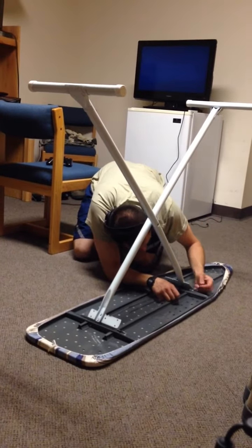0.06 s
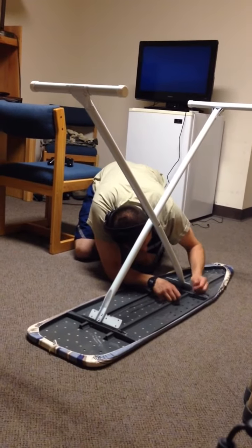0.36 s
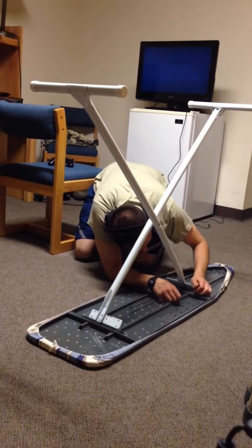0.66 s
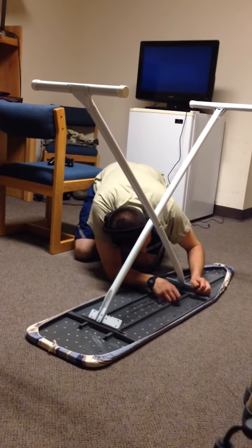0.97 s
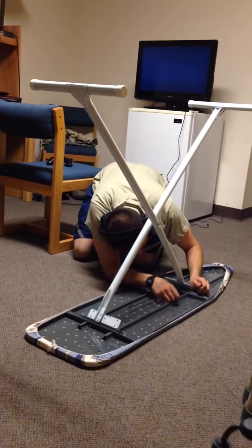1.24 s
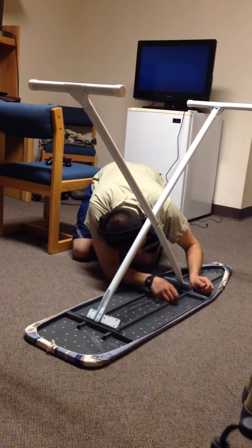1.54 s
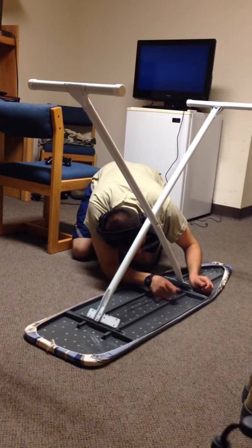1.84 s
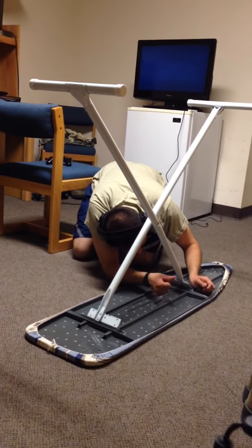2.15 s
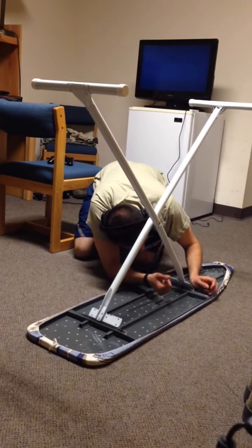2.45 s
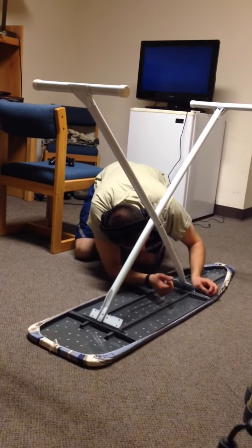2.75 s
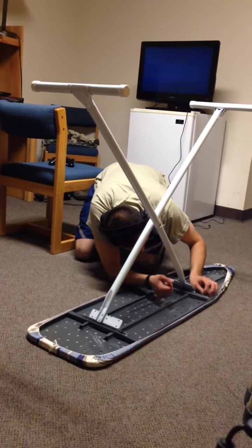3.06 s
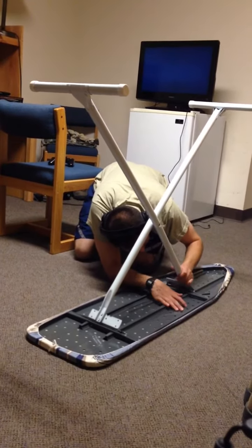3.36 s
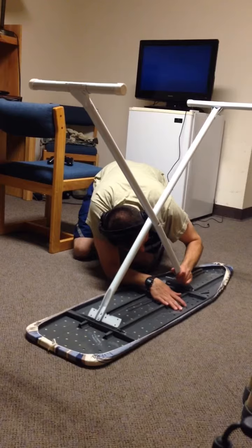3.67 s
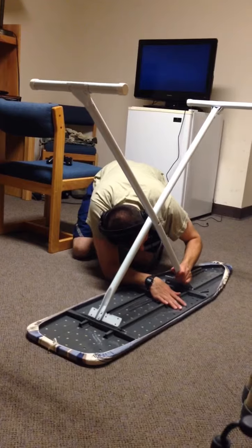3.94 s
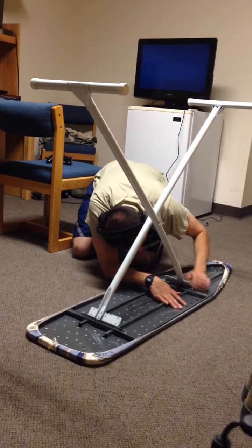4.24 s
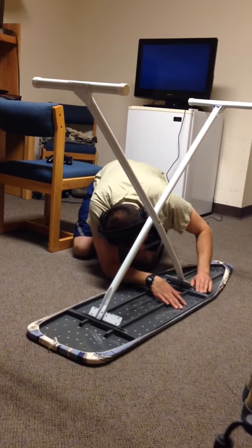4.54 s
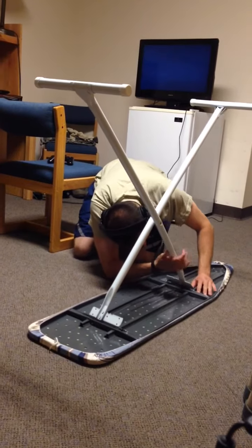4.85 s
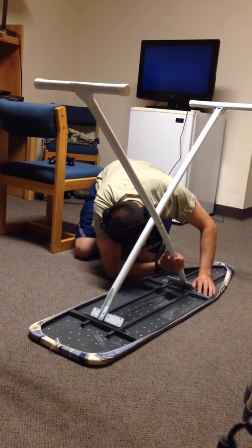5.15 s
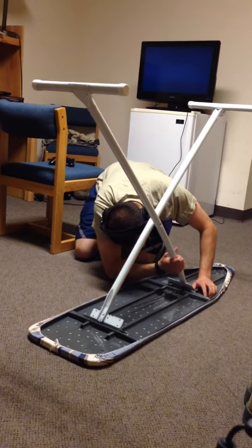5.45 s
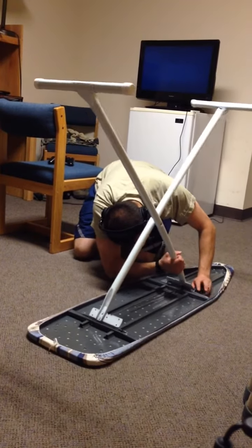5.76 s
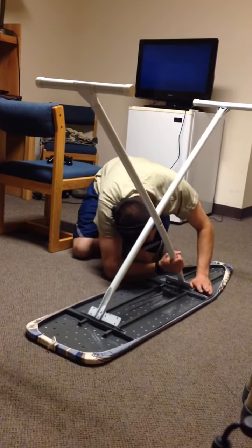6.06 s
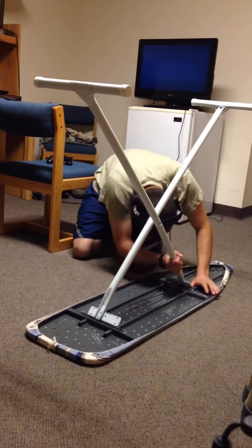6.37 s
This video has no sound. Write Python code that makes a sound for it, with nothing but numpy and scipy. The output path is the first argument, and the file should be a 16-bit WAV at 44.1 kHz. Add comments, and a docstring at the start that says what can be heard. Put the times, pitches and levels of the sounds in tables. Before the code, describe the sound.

Someone works the latch of an ironing board, making scattered steel clacks, scrapes and ticks over a low fridge hum.

```python
"""An ironing board lies upside down on a carpet in a small dry room; a fridge and ventilation run throughout.
Sleeves rustle, the steel catch clacks and the pivot squeaks; a rod scrapes along and knocks the frame.
At 2.6 s the latch hits hardest, chattering on the perforated sheet and ringing the tube legs.
Light ticks and a small rattle of the rod's guide follow as the hands shift their grip.
From 5.5 s the release lever and pawl close the scene with a flurry of clacks, scrapes and thin squeaks."""
import sys
import numpy as np
from scipy import signal
from scipy.fft import rfft, irfft
from scipy.io import wavfile
from scipy.ndimage import uniform_filter1d

SR = 44100
rng = np.random.default_rng(int(sys.argv[2]) if len(sys.argv) > 2 else 0)


def log_audio(samples):
    """Write samples as a 16-bit WAV file to the path given in sys.argv[1]."""
    # one column per channel
    frames = np.atleast_2d(samples).T
    # limit to full scale, then quantise
    limited = np.clip(frames, -1, 1)
    pcm = np.round(limited * 32767).astype(np.int16)
    wavfile.write(sys.argv[1], SR, pcm)


N = 282240
TOP_HZ = 15400
TIME = np.arange(N) / SR
FREQ = np.maximum(np.fft.rfftfreq(N, 1 / SR), 1)
BLOW_TIME = TIME[:SR // 2]  # the half second in which one blow dies away


def undb(db):
    """Decibels to gain."""
    return 10 ** (np.asarray(db) / 20)


def unit(x):
    """Scale to an rms of one."""
    return x / np.sqrt(np.mean(x ** 2))


def burst_level(x, db):
    """Scale a short sound so that its energy, packed into 10 ms, has this level."""
    return x * undb(db) * np.sqrt(SR / 100 / np.sum(x ** 2))


def add(track, start_s, x):
    """Mix a sound in at a time."""
    start = max(int(start_s * SR), 0)
    track[start:start + len(x)] += x[:max(N - start, 0)]


def curve(points, hz):
    """Read (Hz, value) points on a log-frequency axis."""
    points_hz, values = np.transpose(points)
    return np.interp(np.log(hz), np.log(points_hz), values)


def bell(hz, centre_hz, octaves):
    """A hump of height one around a frequency."""
    return np.exp(-.5 * (np.log2(hz / centre_hz) / octaves) ** 2)


def colour(x, db_at, smooth_bins=61):
    """Causal EQ that gives a burst the broad spectrum db_at(Hz) and keeps its fine ripple."""
    spectrum = rfft(x)
    hz = np.maximum(np.fft.rfftfreq(len(x), 1 / SR), 1)
    broad = np.sqrt(np.abs(uniform_filter1d(np.abs(spectrum) ** 2, smooth_bins)) + 1e-18)
    cepstrum = irfft(np.log(undb(db_at(hz)) / broad))
    cepstrum[1:len(x) // 2] *= 2  # minimum phase keeps the attack sharp
    cepstrum[len(x) // 2 + 1:] = 0
    return irfft(spectrum * np.exp(rfft(cepstrum)))


def fade(t60):
    """Exponential decay that falls 60 dB in t60 seconds."""
    return np.exp(-np.log(1000) * BLOW_TIME / t60)


def drift(turns_per_s):
    """A smooth random wander with an rms of one."""
    hold = int(SR / turns_per_s)
    steps = np.repeat(rng.standard_normal(N // hold + 1), hold)
    return unit(uniform_filter1d(steps, hold)[:N])


def noise_bed(spectrum_db):
    """Steady noise with this spectrum and an rms of one."""
    return unit(irfft(rfft(rng.standard_normal(N)) * undb(spectrum_db)))


# The dark rush of ventilation and fridge. Each row: frequency in Hz, relative level in dB.
AIR_SPECTRUM = [(18, -11), (30, -4), (62, -5.5), (80, -2.5), (130, -1.5), (190, -3.5), (230, -12),
                (480, -18), (850, -14), (1500, -18), (2300, -28), (5000, -34.5), (10000, -43),
                (16000, -43.5)]
# Duct and cabinet resonances. Each row: centre in Hz, width in Hz, boost or cut in dB.
DUCT_RESONANCES = [(282, 23, 6), (377, 34, 5.5), (606, 36, 9.5), (676, 42, 7), (861, 60, 8.5),
                   (1020, 150, -6.5), (1180, 50, 6.5), (1729, 50, 7)]
# The hum of the motors. Each row: pitch in Hz, rms level in dB.
MOTOR_TONES = [(80, -66.5), (188.4, -66.5), (1707, -80)]


def machines(air_db=-56, waver_db=2.5, waver_hz=1.5):
    """Room tone: air rushing through ducts, and the unsteady hum of motors."""
    duct_db = sum(lift / (1 + (2 * (FREQ - hz) / width) ** 2) for hz, width, lift in DUCT_RESONANCES)
    air = noise_bed(curve(AIR_SPECTRUM, FREQ) + duct_db) * undb(air_db + 0.56 * drift(4))
    hum = np.zeros(N)
    for hz, db in MOTOR_TONES:
        gain = undb(db + waver_db * drift(8.3))
        phase = 2 * np.pi * np.cumsum(hz + waver_hz * drift(7.2)) / SR
        hum += gain * unit(np.sin(phase))
    return air + hum


# The room's short tail. Each row: frequency in Hz, seconds to fall 60 dB.
ROOM_DECAY = [(300, .22), (1200, .325), (3000, .265), (6000, .3), (10000, .225), (15000, .15)]


def room(x, wet_db=-4.7, build_s=0.0065, bands=9):
    """Direct sound, then reflections from near walls and furniture; the carpet takes the treble first."""
    hz = np.maximum(np.fft.rfftfreq(len(BLOW_TIME), 1 / SR), 1)
    noise = rfft(rng.standard_normal(len(BLOW_TIME)))
    centres = np.geomspace(300, TOP_HZ, bands)
    tail = 0
    for centre, share in zip(centres, np.eye(bands)):
        band = irfft(noise * np.interp(np.log(hz), np.log(centres), share))
        tail += band * fade(curve(ROOM_DECAY, centre))
    tail *= 1 - np.exp(-(BLOW_TIME / build_s) ** 2)
    tail = colour(tail, lambda f: -3 / (1 + (9000 / f) ** 4), smooth_bins=201)
    echo = signal.fftconvolve(x, tail / np.sqrt(np.sum(tail ** 2)))[:N]
    wet = undb(wet_db)
    return (x + wet * echo) / np.sqrt(1 + wet ** 2)


# The hands shift their grip. Each row: start in seconds, end in seconds, rustle level in dB.
GRIP_SHIFTS = [(0, .2, -65), (1.01, 1.306, -68), (3.299, 3.946, -70), (4.15, 4.892, -74.5),
               (5.154, 6.4, -69)]


def sleeves(still_db=-81, ease_s=0.19, grain_db=3.0):
    """Cloth and skin brush the board, swelling while the hands move and sinking when they rest."""
    brush = noise_bed(31 * bell(FREQ, 1700, 1.6))
    rustle_db = np.full(N, float(still_db))
    for start, end, moving_db in GRIP_SHIFTS:
        rustle_db[(TIME >= start) & (TIME < end)] = moving_db
    rustle_db = uniform_filter1d(rustle_db, int(ease_s * SR))
    return brush * undb(rustle_db + grain_db * drift(60))


def finger_touches(per_s=4, db=-66, spread_db=2, centre_hz=5400, spread_octaves=.3, width_octaves=1.0):
    """Moving fingers brush the steel at random: faint extra rows for ticks() in each shift of grip."""
    for start, end, _ in GRIP_SHIFTS:
        count = max(round((end - start) * per_s), 1)
        for k in range(count):
            loud, high = rng.standard_normal(2)
            when = start + (end - start) * (k + rng.random()) / count
            yield when, db + spread_db * loud, centre_hz * 2 ** (spread_octaves * high), width_octaves


def contacts(chatter_s, count=7, fall_db=2.6):
    """A first impact, then ever weaker rebounds of the loose part, about half of chatter_s apart."""
    order = np.arange(count)
    when = (order + rng.uniform(-.3, .3, count) * (order > 0)) * chatter_s / 2
    pushes = np.zeros(len(BLOW_TIME))
    np.add.at(pushes, (when * SR).astype(int), undb(-fall_db * order))
    return pushes


def strike(chatter_s, ring_t60, crack_gain, crack_t60=0.022, ring_top_hz=7000):
    """Each contact lands on another spot: a bright crack and a fresh, duller ring of crowded modes."""
    energies = contacts(chatter_s) ** 2

    def excite(t60):
        power = signal.fftconvolve(energies, fade(t60) ** 2)  # unrelated rings add in power
        return rng.standard_normal(len(BLOW_TIME)) * np.sqrt(np.abs(power[:len(BLOW_TIME)]))
    ring = signal.lfilter(*signal.butter(1, ring_top_hz, fs=SR), excite(ring_t60))
    return ring + crack_gain * excite(crack_t60)


# Small, distinct clicks of rod and spring.
# Each row: start in seconds, level in dB, centre in Hz, width in octaves.
ROD_TICKS = [(.120, -59, 4300, .85), (.244, -57.5, 4760, 1.5), (.921, -45, 4000, .42),
             (.925, -47.5, 1800, 1.2), (1.011, -58.5, 5970, 0.84), (3.444, -48.5, 1700, 1.2),
             (3.564, -56, 3870, 0.48), (4.202, -51.5, 2020, 1.5), (4.786, -52.5, 2300, 1.1),
             (4.847, -54.5, 5400, 1.2), (4.879, -48, 1450, 1.35), (4.9863, -41.2, 8800, 1.0),
             (5.196, -59, 5000, 1.5), (5.278, -51, 3700, 1.6), (5.474, -58.5, 4500, 2.2),
             (5.945, -44.5, 520, .6)]


def ticks(ring_t60=0.071, focus_db=28):
    """Light touches of rod, spring and fingers ring only a small part, briefly."""
    out = np.zeros(N)
    for start, db, centre_hz, octaves in [*ROD_TICKS, *finger_touches()]:
        def tone(hz):
            low_cut_db = 30 / (1 + (hz / 600) ** 4)
            return focus_db * bell(hz, centre_hz, octaves) - low_cut_db
        tick = strike(chatter_s=0.0042, ring_t60=ring_t60, crack_gain=0.4)
        add(out, start, burst_level(colour(tick, tone), db))
    return out


# Dry steel chirps at the pivot. Each row: start in seconds, length in seconds, pitch in Hz,
# level in dB, fall per overtone in dB, wobble as a fraction of the pitch.
PIVOT_SQUEAKS = [(0.528, 0.029, 2112, -42, 2, 0.075), (0.572, 0.028, 2095, -58, 2, 0.051),
                 (0.873, 0.014, 1837, -49.5, 8, 0.089), (0.896, 0.012, 1840, -56, 5, .04),
                 (5.53, 0.036, 7250, -62.5, 20, 0.044), (5.908, 0.037, 7150, -52, 20, 0.051)]


def squeaks(harmonics=4):
    """The pivot sticks and slips fast: a wavering pitch with overtones."""
    out = np.zeros(N)
    for start, length, pitch_hz, db, fall_db, wobble in PIVOT_SQUEAKS:
        n = int(length * SR)
        phase = 2 * np.pi * np.cumsum(pitch_hz * (1 + wobble * drift(1800)[:n])) / SR
        tone = sum(undb(-fall_db * k) * np.sin(k * phase)
                   for k in range(1, harmonics + 1) if k * pitch_hz < TOP_HZ)
        add(out, start, unit(tone) * undb(db) * signal.windows.tukey(n, .5))
    return out


# The tinny voice of the perforated sheet. Each row: frequency in Hz, relative level in dB.
SHEET_SPECTRUM = [(100, -32.5), (330, -23), (590, -13), (770, -3.5), (1100, 2.5), (1900, -1.97),
                  (2700, -2.5), (4800, -5.5), (7000, -6), (10000, -12), (13500, -12), (15500, -12)]


def sheet_db(hz):
    """The sheet's crowded modes merge into one broad colour, shared by scrapes and clacks."""
    return curve(SHEET_SPECTRUM, hz)


# The rod slides in its guide. Each row: start in seconds, length in seconds, level in dB.
ROD_SLIDES = [(1.133, 0.017, -49), (1.43, 0.029, -42), (3.774, 0.019, -49), (5.816, 0.082, -45.5),
              (5.89, 0.1, -61), (6.13, 0.041, -49)]


def scrapes(grain_db=6, slips_per_s=600, ring_t60=0.041):
    """Dense uneven slips of the rod rattle the sheet, growing as it gathers speed."""
    out = np.zeros(N)
    n = len(BLOW_TIME)
    for start, length, db in ROD_SLIDES:
        slips = (rng.random(n) < slips_per_s / SR) * undb(grain_db * rng.standard_normal(n))
        slips *= np.sqrt(BLOW_TIME / length) * (BLOW_TIME < length)
        ring = rng.standard_normal(n) * fade(ring_t60)
        rattle = signal.fftconvolve(slips, ring)[:n]
        rattle = colour(rattle, lambda hz: sheet_db(hz) + 6 * bell(hz, 2540, 0.72), smooth_bins=301)
        add(out, start, rattle * undb(db) * np.sqrt(length * SR / np.sum(rattle ** 2)))
    return out


# The character of each named part at medium force. Each row: chatter in seconds, bass in dB,
# treble in dB, place (0 rings like the hard latch hit, 1 or more like the lever),
# its own ring in Hz, that ring's boost in dB.
PART_VOICES = { "catch": (.007, -2.5, -3, 0.7, 1900, 2.5), "latch": (.007, -3.8, -1, 0, 850, 5),
               "stop": (.0009, 7.5, -1.5, 1.5, 1750, 6.5), "rod": (.0045, -0.5, 4.5, .65, 2300, 4.5),
               "guide": (.0045, -.5, -5, .6, 2250, 7.5), "pawl": (.0016, -3, 1, .2, 3600, 3),
               "lever": (.001, 1.3, -2, .92, 1740, 2.5)}
# The main hits on the frame. Each row: start in seconds, level in dB, the part that hits.
FRAME_HITS = [ (.371, -31.6, "guide"), (.387, -26.5, "catch"), (0.4354, -23.3, "catch"),
              (1.1535, -28.3, "stop"), (1.444, -38.5, "rod"), (1.465, -30, "rod"), (1.470, -34.5, "rod"),
              (2.600, -11.4, "latch"), (3.755, -42.5, "guide"), (3.7696, -34.5, "guide"),
              (3.867, -46.5, "guide"), (5.494, -45, "lever"), (5.62, -29.5, "pawl"),
              (5.814, -41.3, "guide"), (5.839, -36.5, "guide"), (5.863, -39, "guide"),
              (5.9693, -20, "lever"), (6.113, -26.3, "lever"), (6.188, -44, "lever"),
              (6.246, -31.5, "pawl")]


def blows(medium_db=-30, treble_per_db=0.38, bass_per_db=0.09):
    """Each hit takes its part's voice; a harder blow is a shorter contact, so brighter and thinner."""
    for start, db, part in FRAME_HITS:
        chatter_s, bass_db, treble_db, place, part_hz, part_db = PART_VOICES[part]
        force_db = db - medium_db
        bass_db -= bass_per_db * force_db
        treble_db += treble_per_db * force_db
        yield start, db, chatter_s, bass_db, treble_db, place, part_hz, part_db


# The clear notes of frame and legs. Each row: pitch in Hz, relative level in dB when struck
# at the latch, relative level in dB when struck at the lever.
TUBE_MODES = [(821, -21, -48), (939, -26, -18.5), (1072, -17.5, -22.5), (1155, -21.5, -14),
              (1470, -23.5, -12.5), (1710, -32.5, -24), (1682, -24, -28), (1930, -32.5, -9),
              (2128, -34.5, -10), (2693, -27, -35), (3090, -22, -33), (3500, -20.5, -26), (3680, -20, -19),
              (3776, -19, -26), (4000, -21, -32), (4730, -22.5, -33), (5512, -33, -14.5),
              (5660, -32.5, -17.5), (5950, -20, -37), (6200, -21, -37), (6400, -25.5, -23),
              (6693, -28.5, -16.5), (6920, -16, -34.5), (6916, -17.5, -27), (7245, -12.5, -29),
              (7763, -23.5, -25.5), (7891, -39.5, -21), (9118, -27, -38), (9456, -22.5, -32),
              (13600, -23, -42)]


def frame_rings(ring_db=-9.0, t60_at_1k=.21, damping=.19, prompt_gain=1.7, prompt_t60=.08):
    """The tubes ring after each blow, strongly, then faintly; where it lands decides which modes speak."""
    out = np.zeros(N)
    hz, latch_db, lever_db = np.transpose(TUBE_MODES)
    lingering = np.array([fade(t60_at_1k * (f / 1000) ** -damping) for f in hz])
    attack = 1 - fade(.012)
    envelopes = (lingering + prompt_gain * fade(prompt_t60)) * attack
    waves = envelopes * np.exp(2j * np.pi * hz[:, None] * BLOW_TIME)
    for start, db, _, bass_db, _, place, _, _ in blows():
        place = np.clip(place, 0, 1)
        dull_db = max(bass_db, 0) * (hz > 3000)  # a heavy part barely wakes the high modes
        gains = undb(db + ring_db - dull_db + (1 - place) * latch_db + place * lever_db)
        phases = np.exp(2j * np.pi * rng.random(len(hz)))
        add(out, start, np.imag((gains * phases) @ waves))
    return out


def clacks(sheet_t60=0.11, uneven_db=2.5, groups=70):
    """Blows on the sheet; heavy parts bring bass, hard edges treble, and each part its own ring."""
    out = np.zeros(N)
    groups_hz = np.geomspace(700, TOP_HZ, groups)
    for start, db, chatter_s, bass_db, treble_db, _, part_hz, part_db in blows():
        favoured_db = uneven_db * rng.standard_normal(groups)  # each spot favours other groups of modes

        def tone(hz):
            shelves_db = bass_db / (1 + (hz / 2200) ** 4) + treble_db / (1 + (8500 / hz) ** 6)
            own_ring_db = part_db * bell(hz, part_hz, .25)
            return sheet_db(hz) + shelves_db + own_ring_db + np.interp(hz, groups_hz, favoured_db)
        clack = strike(chatter_s, sheet_t60, crack_gain=0.86)
        add(out, start, burst_level(colour(clack, tone), db))
    return out


def scene():
    """The mono mix: handling goes through the room; tube rings and machines stay dry."""
    handling = clacks() + ticks() + scrapes() + squeaks() + sleeves()
    return (room(handling) + frame_rings() + machines())[None]


def record(dry):
    """A steep high cut takes off the very top."""
    return signal.sosfilt(signal.ellip(10, .2, 70, TOP_HZ, fs=SR, output="sos"), dry)


dry = scene()
out = record(dry)
log_audio(out)
```